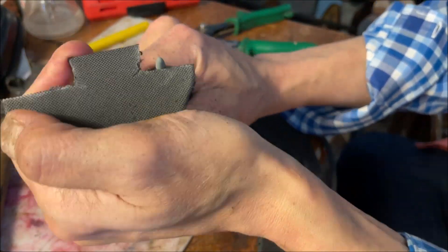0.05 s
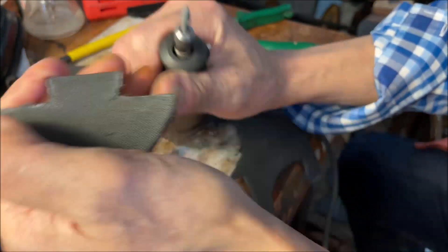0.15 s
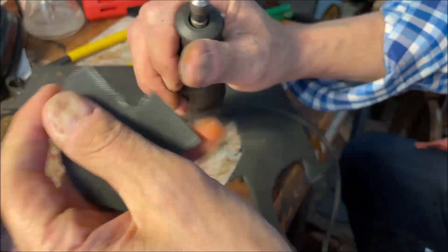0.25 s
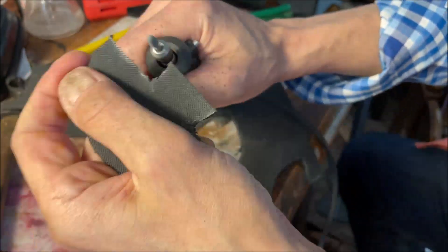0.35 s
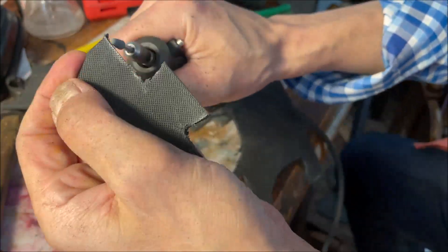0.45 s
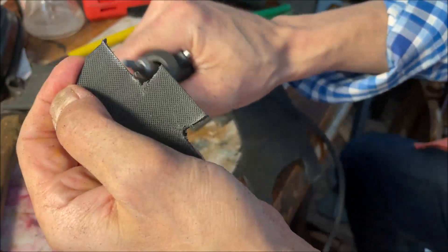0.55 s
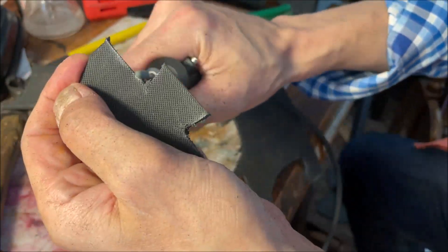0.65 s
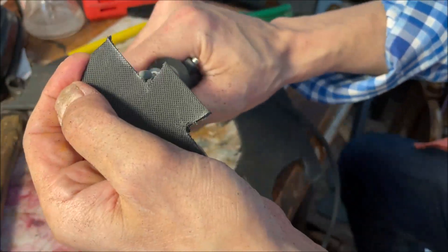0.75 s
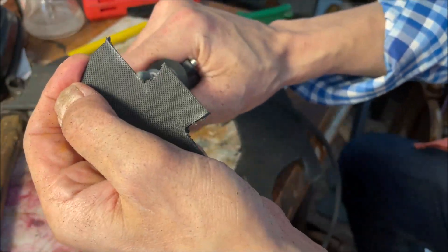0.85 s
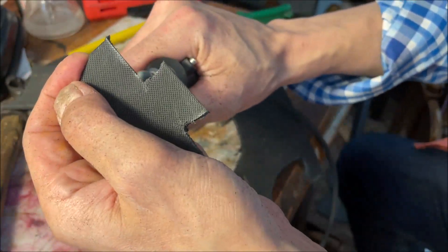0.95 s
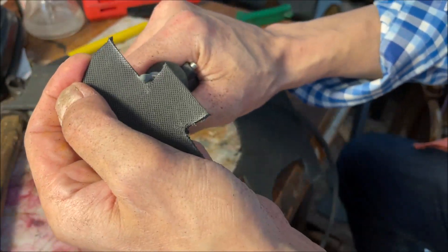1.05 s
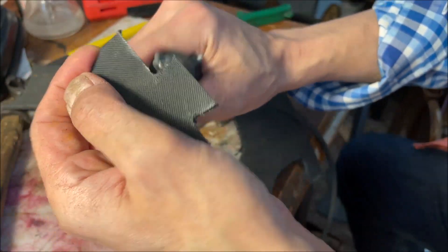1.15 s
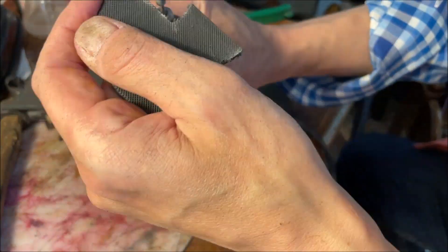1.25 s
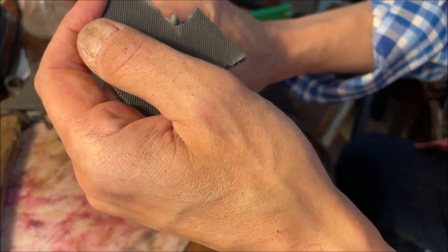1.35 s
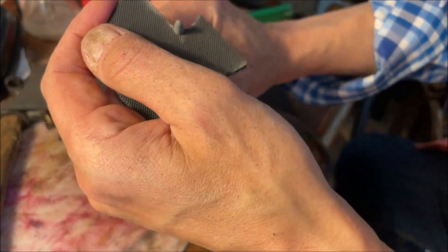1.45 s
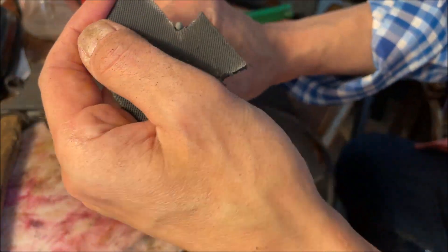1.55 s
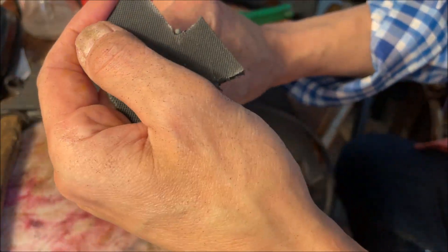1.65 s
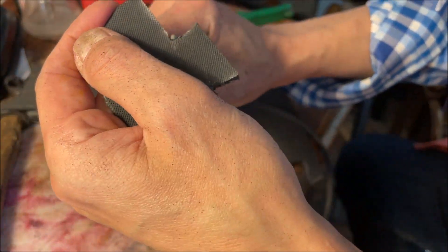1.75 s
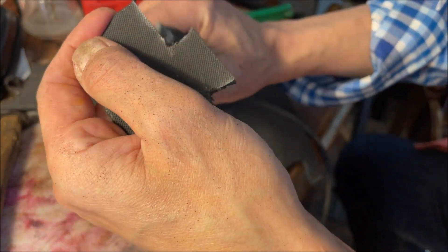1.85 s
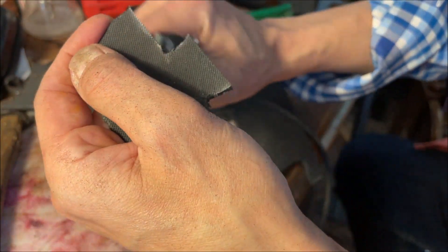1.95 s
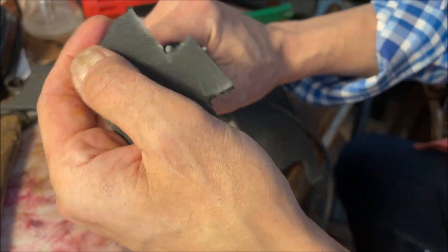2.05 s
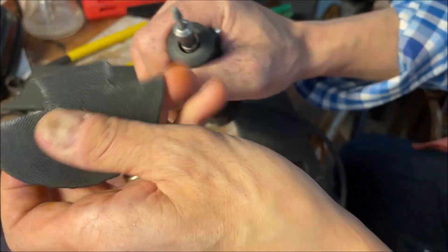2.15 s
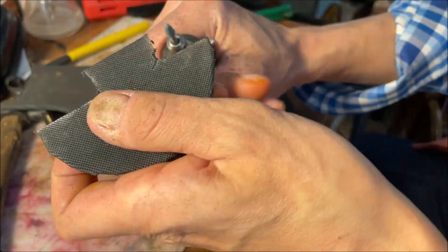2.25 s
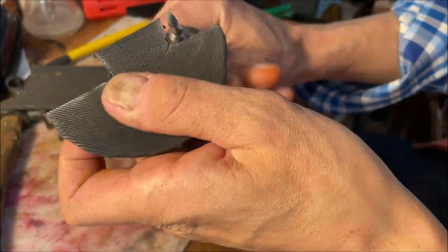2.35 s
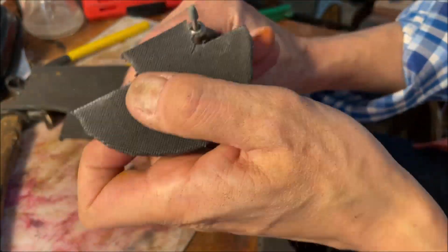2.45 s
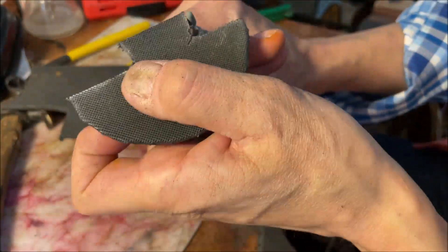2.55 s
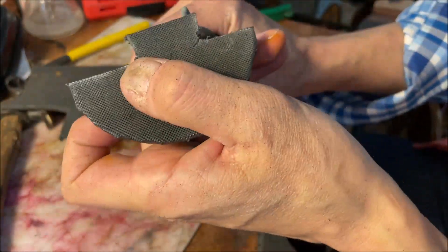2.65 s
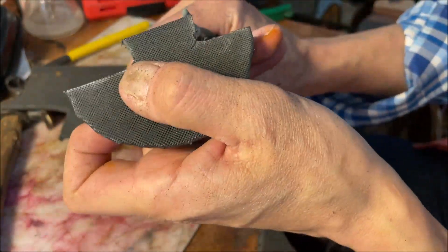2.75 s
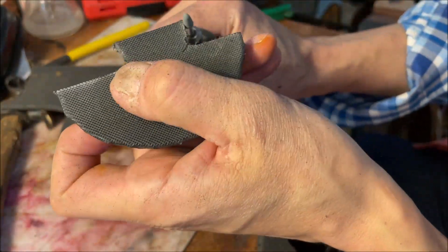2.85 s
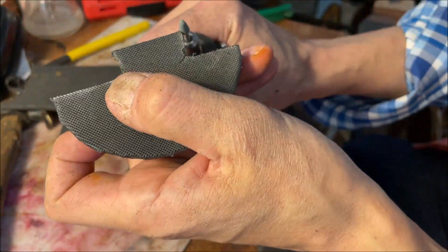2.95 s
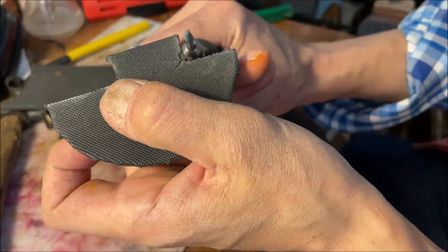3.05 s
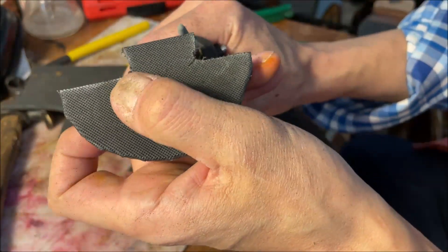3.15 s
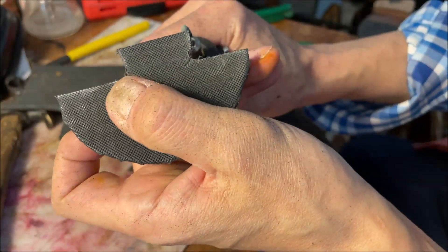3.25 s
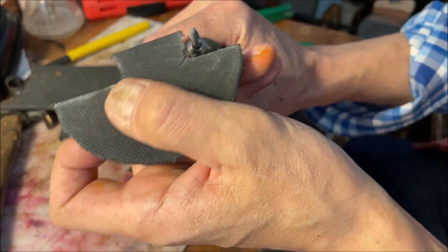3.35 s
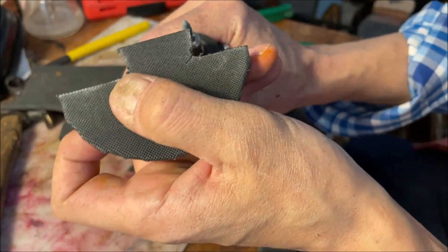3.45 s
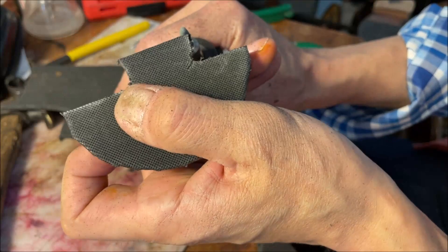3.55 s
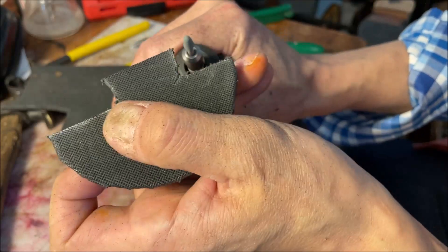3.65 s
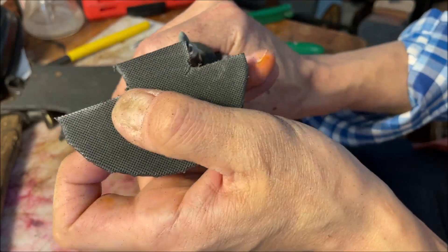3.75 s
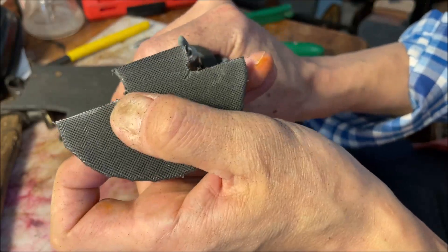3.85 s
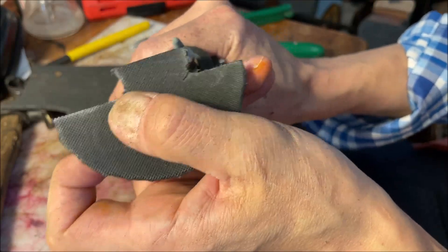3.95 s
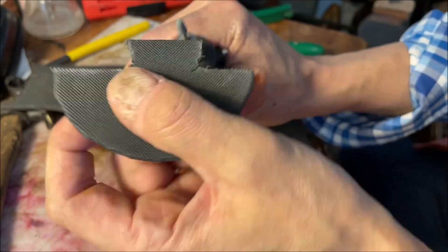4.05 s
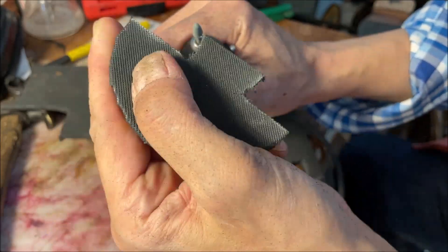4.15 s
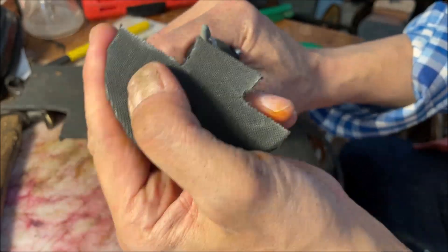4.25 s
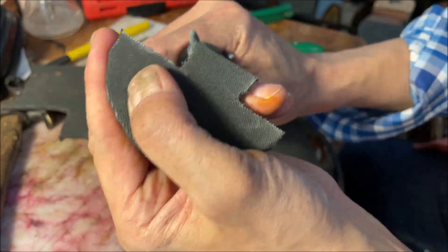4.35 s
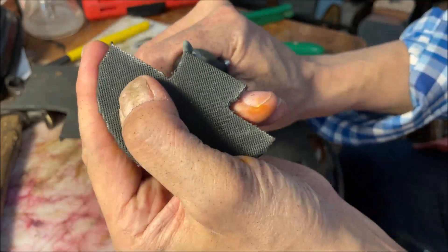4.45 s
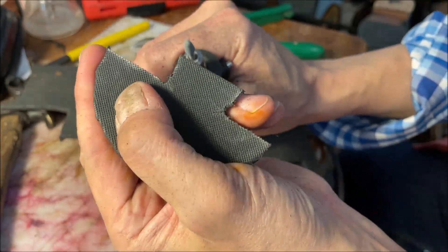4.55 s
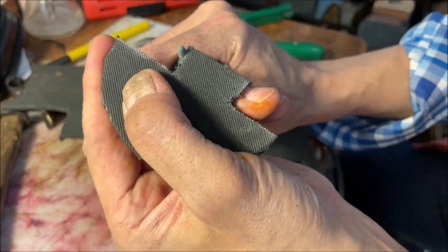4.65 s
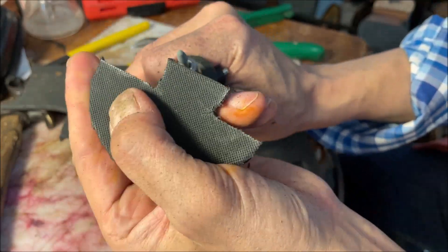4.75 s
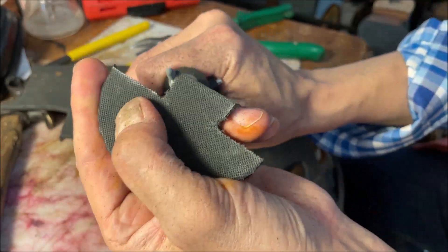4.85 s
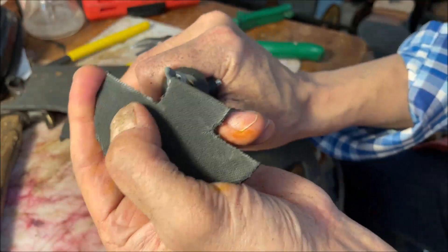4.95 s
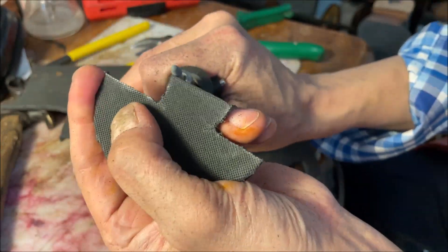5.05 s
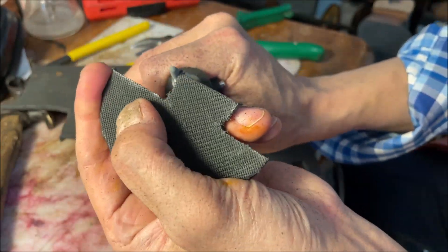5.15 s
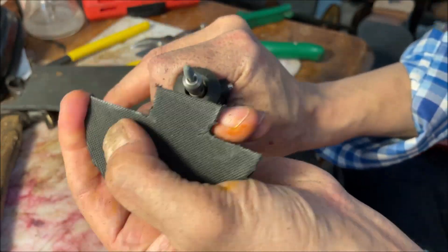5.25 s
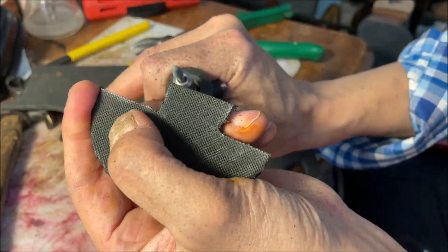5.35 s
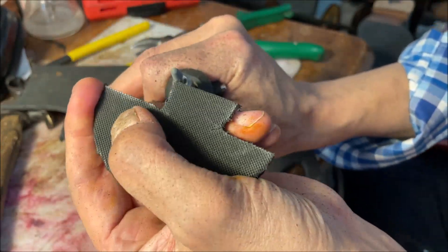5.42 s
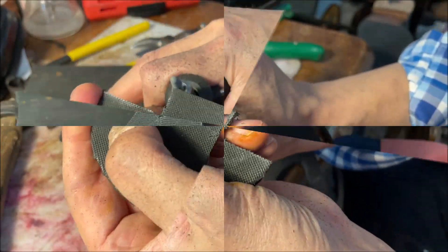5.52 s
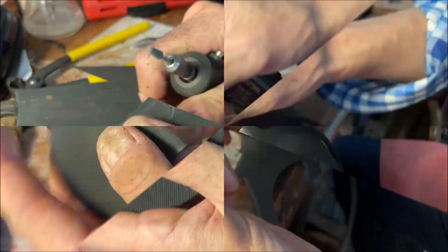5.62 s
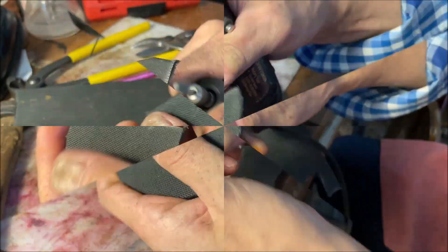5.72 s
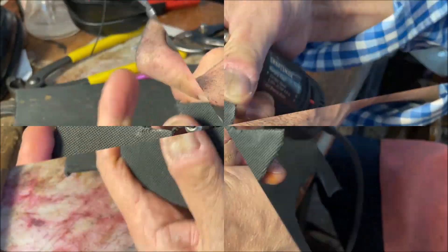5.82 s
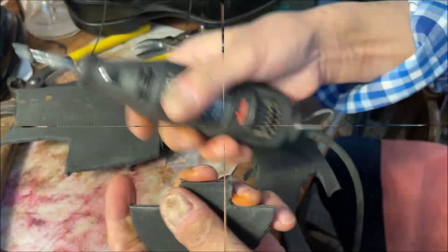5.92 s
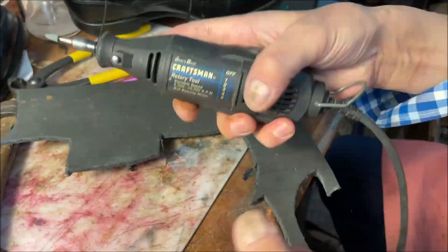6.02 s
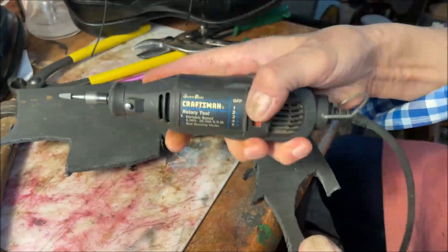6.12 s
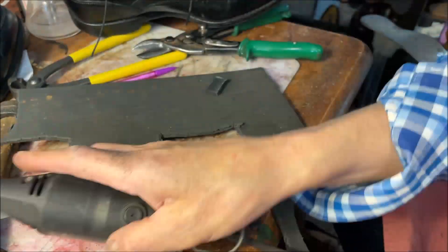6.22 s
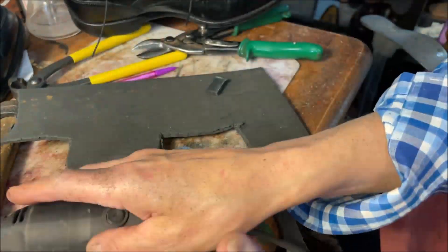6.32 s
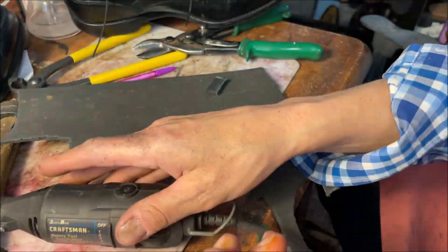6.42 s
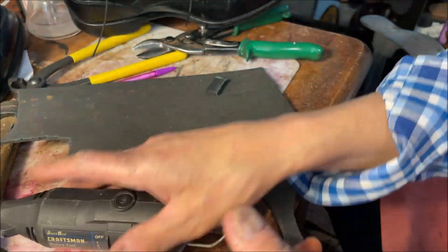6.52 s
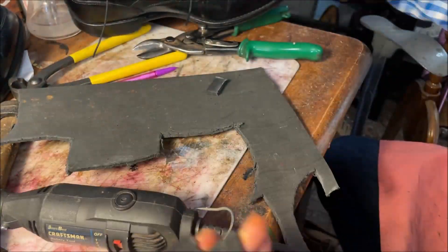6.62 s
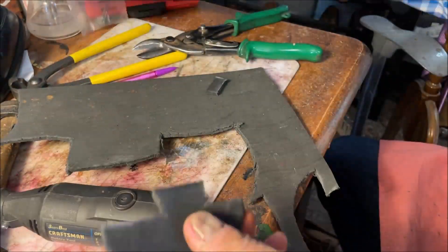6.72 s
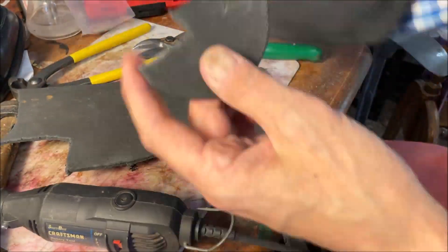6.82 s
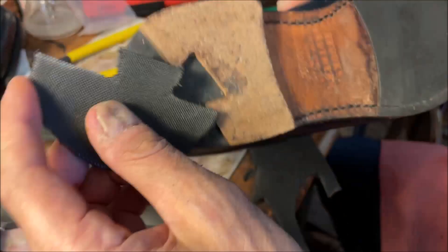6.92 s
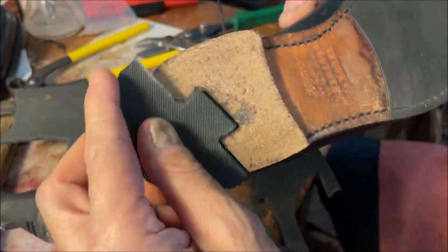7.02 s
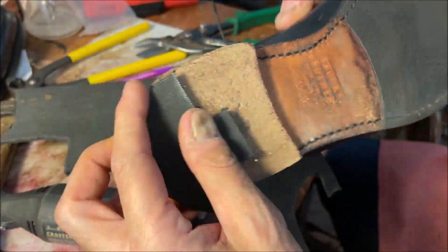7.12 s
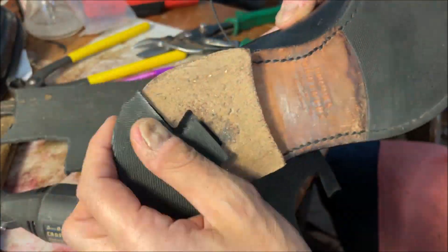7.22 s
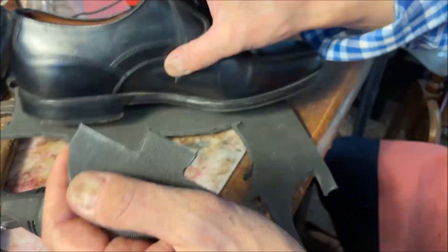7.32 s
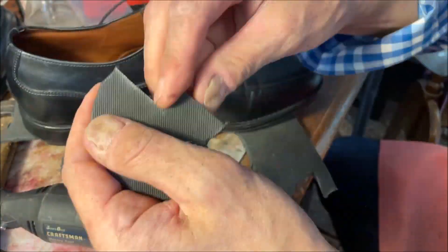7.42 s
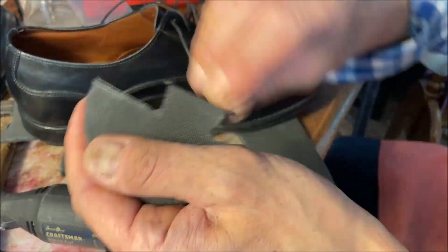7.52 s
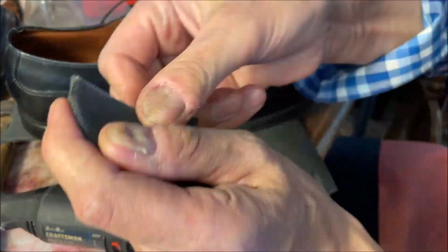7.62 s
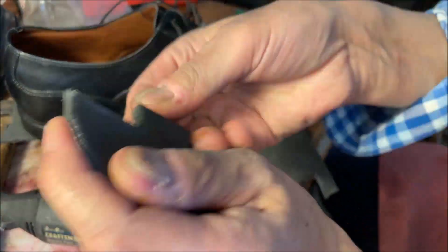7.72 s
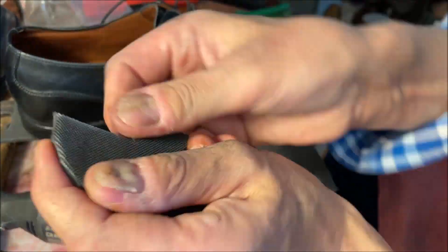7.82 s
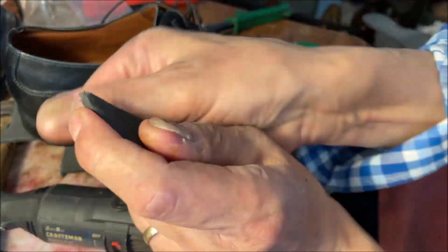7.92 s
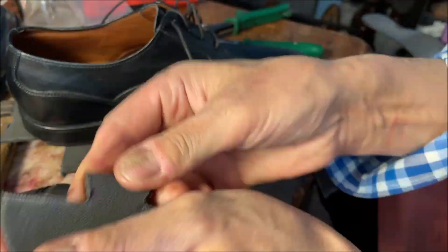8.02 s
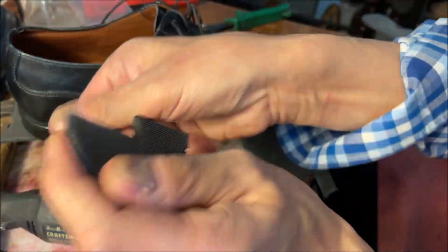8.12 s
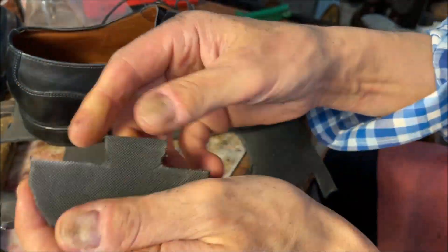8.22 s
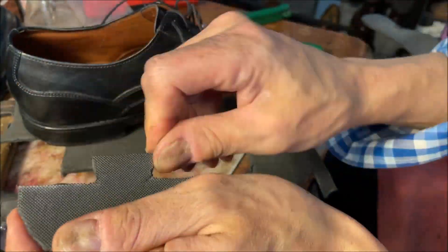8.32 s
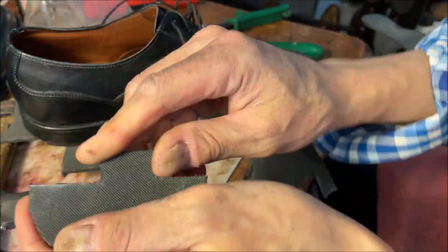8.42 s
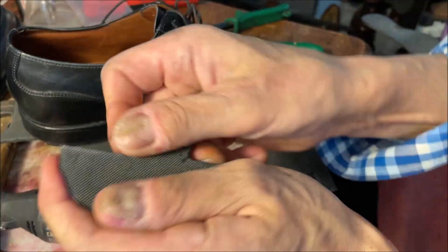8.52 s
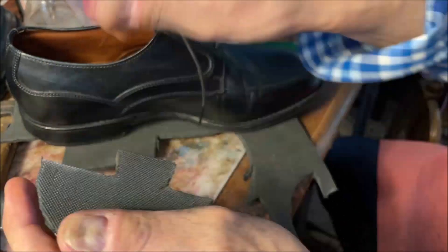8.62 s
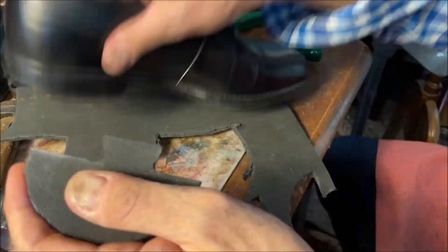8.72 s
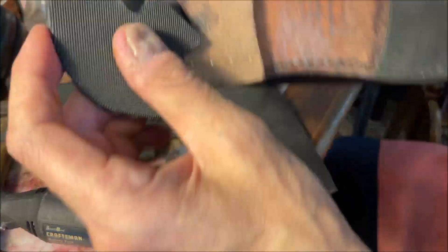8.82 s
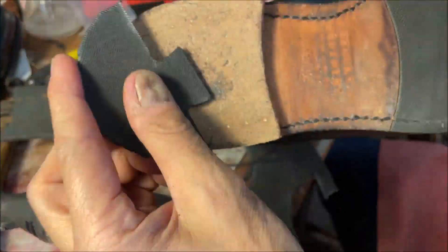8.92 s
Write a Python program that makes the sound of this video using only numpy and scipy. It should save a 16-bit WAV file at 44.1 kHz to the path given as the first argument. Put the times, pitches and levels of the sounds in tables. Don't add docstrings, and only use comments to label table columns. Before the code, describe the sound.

A steady low-mid hum and dull roar of a distant machine fill a small workshop, heard through a close, bright stereo microphone with little bass. From 0 to about 5.5 s a handheld rotary tool, slightly left, whines shrilly with a rough electrical buzz and strong hiss; every push into rubber drags the pitch down, then it recovers, with brief squeals, clustered near 1 s and from 4.3 to 5.3 s. At 5.5 s a faster whine overlaps, and the first ends abruptly at 6.0. Switched off near 6.2, it glides steeply downward. At 6.4 it knocks the bench and rattles metallically, slowing and fading by 6.8 with a few final clacks. Then, over the hum, fingers rub rubber; light ticks follow, a firmer click at 7.4, another around 8.15, and short faint squeaks, mostly 8.2 to the end at about 9 s.

```python
import sys
import numpy as np
from scipy import signal
from scipy.io import wavfile
from scipy.ndimage import uniform_filter1d

SR = 44100
rng = np.random.default_rng(int(sys.argv[2]) if len(sys.argv) > 2 else 0)


def persist_wave(psi):
    counts = np.round(np.clip(psi, -1, 1) * 32767).astype(np.int16)
    wavfile.write(sys.argv[1], SR, np.atleast_2d(counts).T)


def boost(x):
    u = np.asarray(x, float) / 20
    return 10 ** u


N = 396018
T = np.arange(N) / SR

# time_s, level_db
SHOP = [(0.0, -40), (5.5, -40), (5.58, -39.5), (6.03, -36), (6.04, -41), (6.45, -41), (7.0, -41.5),
        (7.6, -40.5), (8.98, -38.5)]
# frequency_hz, density_db (per Hz)
SHOP_COLOUR = [(24, -48), (80, -52), (140, -25), (200, -12), (300, -20.5), (430, -12), (600, -26.5),
               (950, -25), (1120, -29), (1700, -24), (1850, -37.5), (3600, -43.5), (6000, -63),
               (16000, -80)]
# frequency_hz, width_hz, level_db
SHOP_RINGS = [(858, 24, -51), (733, 60, -48)]
# frequency_hz, likeness (0 to 1)
SHOP_SAME = [(60, .6), (130, 1), (550, 0.91), (1000, 1), (1650, 0.3), (15000, 0.46)]
# frequency_hz, phase_rad
SHOP_LEAD = [(0, 6), (150, 0.25), (500, -0.13), (1000, -0.95), (22050, -19.2)]
SHOP_DB, HUM_DB, MAINS_HZ = -43, -36.5, 480.0
WHISTLE_HZ, WHISTLE_DB = 3450, -63.5

# start_s, length_s, level_db, centre_hz, width_hz
RUBS = [(3.915, 0.051, -32, 10400, 1500), (5.936, 0.066, -28, 5170, 1200), (6.777, 0.019, -45, 4000, 5000),
        (6.795, 0.041, -47, 7000, 9000), (7.043, 0.03, -58, 9500, 3000), (7.184, 0.02, -57, 13000, 3000),
        (6.321, 0.14, -38, 940, 400), (7.454, 0.021, -60, 7800, 6000), (7.947, 0.034, -48, 9300, 6000),
        (8.047, 0.026, -54, 8000, 6000), (8.109, 0.056, -52, 9000, 5000), (8.201, 0.07, -44, 3950, 4000),
        (8.215, 0.17, -61, 12500, 5000), (8.43, 0.12, -65, 11000, 6000), (8.597, 0.11, -55, 9000, 6000),
        (8.674, 0.18, -55.5, 10900, 7000)]
# start_s, length_s, start_hz, level_db, third_harmonic_db
SQUEAKS = [(6.852, 0.06, 2440, -50, -55), (7.134, 0.053, 3070, -53, -78), (7.138, .042, 7300, -66, -90),
           (8.24, 0.035, 2300, -47, -65), (8.291, 0.043, 2440, -35, -44), (8.43, 0.041, 2230, -50, -76),
           (8.43, 0.032, 8600, -55, -90), (8.481, 0.04, 2400, -53, -51), (8.619, 0.037, 2400, -49, -44.5),
           (8.699, 0.052, 2500, -53, -52), (8.772, 0.1, 3960, -45, -92), (8.795, 0.048, 3320, -52, -92),
           (8.913, 0.056, 3490, -49, -52), (8.914, 0.051, 7040, -39.5, -90)]
ARCH, ARCH_S, SECOND_DB = 0.17, 0.088, -22

# start_s, peak_db, bench_thud_db, ring_hz, left_right_db
KNOCKS = [(6.3685, -40, -35, 3000, 1), (6.3793, -20, -35, 4370, 7), (6.381, -19, -8.5, 3000, 6),
          (6.445, -27, -22, 9000, 10), (6.4496, -26, -26, 9000, 4), (6.7515, -40, -50, 9000, 5),
          (6.7644, -31, -40, 3730, 15), (6.773, -26, -35, 4200, 5), (6.7802, -22, -39, 4370, 4),
          (6.791, -29, -33, 2980, -2), (6.8147, -16.5, -57, 6300, 5.5), (6.834, -56, -31, 4020, 2)]
# start_s, peak_db, bench_thud_db, ring_hz, left_right_db
TICKS = [(6.929, -44.5, -40, 4500, 13), (6.975, -48, -43, 3840, 17), (7.109, -35, -33, 2300, 6),
         (7.186, -43, -50, 2000, 2), (7.1996, -29.5, -61, 2760, 6), (7.397, -33, -43, 5000, 4),
         (7.401, -22.5, -14.5, 3020, 5), (7.4085, -29, -22, 7350, 4), (7.43, -54, -55, 5500, 4),
         (7.458, -35, -31, 7610, -0.5), (7.4674, -41, -45, 7050, 7), (7.7244, -55, -54, 4030, 2),
         (7.777, -49, -40, 4340, 8), (7.918, -58, -60, 9000, 2), (7.998, -48, -50, 4000, 3),
         (8.088, -47, -55, 5000, 2), (7.9645, -40, -41, 10500, 1.0), (8.0587, -47, -37, 13300, 2),
         (8.132, -46, -37, 8930, 0), (8.1556, -27.5, -26, 10200, 6), (8.19, -45, -48, 4310, 0.0),
         (8.587, -41, -40, 3840, 11), (8.646, -36, -46, 7310, 15), (8.657, -38, -38, 8240, 3),
         (8.6994, -38, -43, 3700, -0.5), (8.903, -43, -37, 7060, 13)]
# frequency_hz, width_hz, level_db
THUD = [(870, 200, 0), (420, 200, 1), (1300, 500, -9)]
THUD_S = .00015

# time_s, shaking_db, bench_weight_db
CHATTER = [(6.4445, -28, -25), (6.462, -19.5, -34.5), (6.512, -29, -36), (6.535, -24, -34),
           (6.55, -31, -35), (6.585, -25, -31.5), (6.63, -29, -39.5), (6.645, -40, -39), (6.7, -33, -34.5),
           (6.733, -47, -28), (6.76, -66, -38)]
# frequency_hz, width_hz, level_db
HANGER = [(13320, 240, 12), (13700, 460, -26.5), (14000, 700, -3.5), (15000, 950, -19), (9000, 770, -32)]
# frequency_hz, width_hz, level_db
WIRE = [(13700, 1300, 0), (9000, 820, -6)]
# frequency_hz, width_hz, level_db
BENCH = [(915, 130, 18.5), (1250, 300, -27), (524, 190, 11.5)]
# frequency_hz, width_hz, level_db
HOUSING = [(2200, 800, 10), (3700, 1000, 11), (6000, 3000, -12)]
# start_s, peak_db
JOLTS = [(6.4438, -9), (6.4492, -9), (6.46, -13), (6.4664, -14), (6.4765, -12), (6.4871, -20),
         (6.5009, -16), (6.5314, -13), (6.5345, -15), (6.5513, -18), (6.561, -16), (6.5746, -17),
         (6.583, -17), (6.5874, -11), (6.5964, -15), (6.6012, -10), (6.611, -14), (6.6234, -13),
         (6.6275, -14), (6.6444, -22), (6.6622, -21), (6.6655, -22), (6.6751, -20), (6.6842, -25),
         (6.6951, -22), (6.7006, -22), (6.7106, -28), (6.7144, -22), (6.7232, -23), (6.7279, -22),
         (6.7336, -22), (6.7407, -27), (6.7507, -25)]
JOLT_S, JOLT_RISE_S = .0005, .0003
CHATTER_END_S, HOUSING_DB, HOUSING_RISE_S = 6.799, -14, 0.033

# time_s, level_db
AIR = [(0.0, -43), (0.45, -45.5), (0.57, -42.5), (1.2, -45.5), (1.8, -43.5), (2.13, -42), (2.2, -43.5),
       (3.6, -46), (4.3, -43), (5.497, -44.5), (5.564, -38.5), (5.927, -40), (5.965, -38), (6.327, -43.5),
       (6.42, -48), (6.455, -47.5), (6.73, -53.5), (6.8, -73)]
# frequency_hz, density_db (per Hz)
HISS_COLOUR = [(590, -15.5), (1000, -25.5), (1140, -26), (1490, -8), (2040, -8.5), (2660, -4.5),
               (2950, -8.5), (3250, -1), (3560, 2), (4440, -1.5), (8050, -1.5), (9150, 0.5), (9820, -2),
               (11200, -1.5), (15100, -8.5), (16200, -22)]
# frequency_hz, likeness (0 to 1)
HISS_SAME = [(60, 1), (240, 0.52), (950, 0.96), (3770, 0.31), (15000, 0.73)]
# frequency_hz, phase_rad
HISS_LEAD = [(0, 4.6), (1550, -1.4), (2580, 1.5), (5170, 2), (5680, 0.4), (8960, 3.5), (9560, 1.77),
             (16500, 0.35)]
# frequency_hz, left_right_db
HISS_PAN = [(60, 13), (180, 38), (550, -29.5), (1650, 4.5), (4970, 5.5), (15000, 4.5)]
HISS_PER_GRIP = 0.21

# start_s, length_s, final_drag_hz (turns per s)
CUTS = [(-.47, .538, 137), (.001, .168, 210), (.536, .699, 192), (.921, .263, 107), (1.08, .026, 262),
        (1.091, .055, 64), (1.157, .068, 153), (1.388, .146, 117), (1.4, .092, 124), (1.535, .599, 109),
        (1.569, .247, 151), (1.979, .611, 28), (2.115, .027, 118), (2.29, .18, 10), (2.622, .229, 222),
        (2.858, .27, 109), (2.899, .054, 39), (3.162, .234, 219), (3.36, .088, 22), (3.456, .208, 370),
        (3.547, .085, 22), (3.773, .199, 122), (3.897, .239, 75), (4.137, .202, 29), (4.255, .055, 75),
        (4.364, .07, 139), (4.458, .15, 157), (4.638, .149, 190), (4.692, .028, 99), (4.784, .192, 62),
        (4.874, .071, 96), (4.998, .095, 223), (5.122, .196, 300), (5.153, .03, 74), (5.457, .121, 27)]
# start_s, length_s, level_db
BITES = [(0, 0.089, -41), (0.513, 0.42, -38.5), (0.874, 0.37, -33.5), (1.373, 0.21, -42.5),
         (1.56, 0.28, -44.5), (1.842, 0.3, -36.5), (2.62, 0.24, -42.5), (2.914, 0.26, -42),
         (3.176, 0.19, -41), (3.436, 0.2, -45.5), (3.993, 0.11, -45), (4.478, 0.11, -41),
         (4.57, 0.045, -42), (4.673, .1, -42), (4.99, 0.08, -44), (5.15, 0.14, -51)]
# centre_s, spread_s, level_db
SQUEALS = [(.02, 0.024, -40), (.15, 0.014, -33.5), (.55, 0.021, -47), (.97, 0.071, -37),
           (1.08, 0.0088, -32.5), (1.18, 0.023, -31.5), (1.8, 0.023, -42), (2.03, 0.049, -40),
           (2.8, 0.02, -37), (3.6, 0.015, -41), (3.76, 0.055, -55), (4.07, 0.033, -58), (4.305, 0.011, -38),
           (4.43, 0.0071, -35), (4.6, 0.0057, -32.5), (4.755, 0.017, -32.5), (4.935, .012, -31.5),
           (5.07, 0.016, -35), (5.18, 0.02, -33.5), (5.225, 0.016, -37), (5.29, 0.029, -45)]
# time_s, whine_db, shaft_db
FACING = [(0.0, -27.5, -60), (0.3, -29, -58), (0.5, -31, -55), (1.05, -33, -54), (1.3, -28.5, -58),
          (2.1, -31, -60), (2.2, -32, -58), (2.4, -28, -56), (3.15, -31, -58), (3.45, -30, -60),
          (3.7, -29, -60), (4.1, -30, -58), (4.3, -28, -55), (4.95, -30.5, -58), (5.3, -30.5, -60),
          (5.65, -29.5, -60), (5.75, -29, -50), (6.03, -28, -44)]
FREE_HZ, INERTIA_S, STEP_S = 1384, .169, .002
FIRST_TOUCH = .142
CURRENT_DB, CURRENT_KNEE_HZ = 6.5, 121
IDLE_THIRD_DB, IDLE_CUTTER_DB, THIRD_PER_GRIP_DB, GRIP_EDGE_S = -47, -47, -31, .03

# time_s, shaft_hz (turns per s)
COAST = [
    (5.5, 1612),
    (5.8, 1664),
    (6.03, 1706),
    (6.12, 1718),
    (6.187, 1712),
    (6.3, 1345),
    (6.4, 1015),
    (6.6, 430),
    (6.77, 60),
]
# time_s, whine_db, third_order_db, shaft_db
COAST_DB = [
    (5.5, -59, -63, -64),
    (5.58, -38, -44, -46),
    (5.8, -33, -40, -53),
    (5.96, -32, -35.5, -51),
    (6.18, -35, -43, -62),
    (6.23, -29, -40, -58),
    (6.27, -34, -38, -47),
    (6.36, -40, -43, -50),
    (6.44, -56, -53, -59),
    (6.7, -90, -76, -74),
]
# mains_multiple, level_db
SIDE_LINES = [(-4, -10.5), (-3, -6), (-2, -4.5), (-1, -2), (0, 1), (1, -2.5), (2, -8.5), (3, -11), (4, -22)]
# frequency_hz, gain_db
CASING = [(8000, -12.5), (8700, 1.5), (9400, 2), (10300, 0), (10900, 1.5), (11600, -3.5), (12100, -2),
          (13500, 2)]
# order, level_db, left_lead_rad
CUTTER = [(1, -11, .2), (2, 1.5, 1.1), (4, -9, -.6), (5, -1.5, .4), (6, -5, 1.2), (7, 0, 1.3), (9, -2, .6),
          (10, -6, .5), (11, -6, .5)]
BARS = 8
FOURTH_DB, RASP, SKIRT = -11, .3, .17


def evened(x):
    return x / np.sqrt(np.mean(x ** 2) + 1e-20)


def read(points, hz):
    f, value = np.transpose(points)
    return np.interp(np.log(hz + 1), np.log(f + 1), value)


def curves(rows, t):
    s, *columns = np.transpose(rows)
    return [np.interp(t, s, c) for c in columns]


def add(mix, s, sound):
    part = mix[:, round(s * SR):][:, :sound.shape[1]]
    part += sound[:, :part.shape[1]]


def pan(db):
    return boost(np.array([[db / 2], [-db / 2]]))


def drift(rate_hz, count, t=T):
    knots = rng.standard_normal((count, 1500))
    return [np.interp(t * np.clip(rate_hz, 1, 160), np.arange(1500), k) for k in knots]


def ring(x, modes):
    out = 0
    for hz, width, db in modes:
        r = np.exp(-np.pi * width / SR)
        pole = r * np.exp(2j * np.pi * hz / SR)
        out = out + 2 * boost(db) * signal.lfilter([1 - r], [1, -pole], x).real
    return out


def noise(colour_db, same, lead, patchy_db, null_db):
    frames = N // 128 + 5
    hz = np.fft.rfftfreq(512, 1 / SR)[:, None]
    a, b, c, d, patches, slots = rng.standard_normal((frames, 257, 6)).T
    patches = evened(uniform_filter1d(uniform_filter1d(patches, 8, 0), 16, 1))
    slots = evened(uniform_filter1d(uniform_filter1d(slots, 3, 0), 24, 1))
    nulls = null_db * np.clip(slots - .8, 0, 1) / (1 + (hz / 3600) ** 3)
    like = np.clip(read(same, hz), 0, 1)
    left = a + 1j * b
    right = like * left * np.exp(-1j * read(lead, hz)) + np.sqrt(1 - like ** 2) * (c + 1j * d)
    level_db = colour_db(hz, np.arange(frames) * 128 / SR) + patchy_db * patches - nulls
    z = np.array([left, right]) * boost(level_db)
    return signal.istft(z, nperseg=512, noverlap=384)[1][:, :N]


def shop():
    level_db, = curves(SHOP, T)
    roar = evened(noise(lambda hz, t: read(SHOP_COLOUR, hz), SHOP_SAME, SHOP_LEAD, patchy_db=1.5, null_db=0.4))
    shared, *own = rng.standard_normal((3, N))
    draught = shared + 0.33 * np.array(own)
    ducts = sum(boost(db) * evened(ring(draught, [(hz, width, 0)])) for hz, width, db in SHOP_RINGS)
    hum = np.sin(2 * np.pi * MAINS_HZ * T + np.array([[0], [.35]])) * pan(-1.1)
    hum = boost(HUM_DB + 2.0 + 0.45 * drift(4.8, count=1)[0]) * hum
    whistle = np.sin(2 * np.pi * WHISTLE_HZ * T + np.array([[0], [.8]]))
    whistle = boost(WHISTLE_DB + 2.3 * drift(12, count=1)[0]) * whistle
    return boost(level_db + 40.5) * (boost(SHOP_DB) * roar + ducts + hum + whistle)


def handling():
    out = np.zeros((2, N))
    for (s, length, db, hz, width), grit in zip(RUBS, rng.standard_normal((len(RUBS), 2, 12000))):
        band = [(hz, width, 0)]
        rub = ring(ring(grit + 0.16 * grit[0], band), band)[:, :int(length * SR)]
        add(out, s, boost(db) * evened(rub) * np.hanning(rub.shape[1]))
    for (s, length, hz, db, third_db), grit in zip(SQUEAKS, rng.standard_normal((len(SQUEAKS), 2, 6000))):
        u = np.linspace(0, 1, int(length * SR))
        arch_hz = hz * ARCH * (length / ARCH_S) ** 4
        wobble, flutter = evened(uniform_filter1d(grit, 120))[:, :len(u)]
        pitch_hz = (hz + arch_hz * np.sin(np.pi * u)) * (1 + .014 * wobble)
        slip = 2 * np.pi * np.cumsum(pitch_hz) / SR
        harmonics_db = (db, db + SECOND_DB, third_db)
        tone = sum(boost(part - 7.5) * np.sin((k + 1) * slip) for k, part in enumerate(harmonics_db))
        add(out, s, pan(1) * tone * boost(4.4 * flutter) * signal.windows.tukey(len(u), .5))
    return out


def ticks():
    out, t = np.zeros((2, N)), np.arange(1500) / SR
    hits = KNOCKS + TICKS
    cracks = rng.standard_normal((len(hits), 1500)) * np.exp(-t / 0.0029) * np.minimum(t / 0.0013, 1)
    push = (1 - t / THUD_S) * np.exp(-t / THUD_S)
    for (s, peak_db, thud_db, ring_hz, side_db), crack in zip(hits, cracks):
        bright = ring(crack, [(ring_hz, 2500, 0), (2300, 1500, -4)])
        bright = ring(bright, [(ring_hz, 5000, 0), (3000, 4000, -2)])
        thud = ring(push + .12 * crack, THUD)
        hit = boost(peak_db) * bright / abs(bright).max() + boost(thud_db) * thud / abs(thud).max()
        add(out, s - .0005, pan(side_db) * hit)
    return out


def chatter():
    start_s = CHATTER[0][0]
    on = (T > start_s) & (T < CHATTER_END_S)
    hanger_db, bench_db = curves(CHATTER, T)
    housing_db = hanger_db + 4.5 + HOUSING_DB - 12 * np.clip(1 - (T - start_s) / HOUSING_RISE_S, 0, 1)
    turns = np.cumsum(curves(COAST, T)[0]) / SR
    luck, size, grit = rng.random(N), rng.exponential(1, N), rng.standard_normal(N)
    taps = np.diff(np.floor(turns), prepend=0) * boost(4.6 * np.minimum(size, 2))
    taps = taps / taps[on].std() + .8 * grit
    scrape = taps + 1.2 * rng.standard_normal((2, N))
    loose = (luck < 2500 / SR) * boost(4.5 * np.minimum(size, 3)) * np.sign(grit)
    parts = [(ring(loose, WIRE), HANGER, hanger_db, 7),
             (taps, BENCH, bench_db, 1.5),
             (scrape, HOUSING, housing_db, 4)]
    out = 0
    for drive, modes, db, side_db in parts:
        rung = ring(drive, modes)
        strength = np.sqrt(abs(uniform_filter1d(rung ** 2, size=900)) + 1e-9)
        out = out + pan(side_db) * on * boost(db) * rung / strength
    t = np.arange(900) / SR
    scuffs = rng.standard_normal((len(JOLTS), 900)) * np.exp(-t / JOLT_S) * np.minimum(t / JOLT_RISE_S, 1)
    for (s, db), clank in zip(JOLTS, ring(ring(scuffs, WIRE), HANGER)):
        add(out, s - .0003, pan(6) * boost(db + 1) * clank / abs(clank).max())
    return out


def cutting():
    t = np.arange(-.5, 7, STEP_S)
    drag, squeal, grip = 0, boost(IDLE_THIRD_DB), boost(IDLE_CUTTER_DB)
    for s, length, push in CUTS:
        u = (t - s) / length
        touching = np.clip((t - s) / .01 + .5, 0, 1) * np.clip((s + length - t) / .01 + .5, 0, 1)
        drag = drag + push * touching * (FIRST_TOUCH + (1 - FIRST_TOUCH) * u)
    for s, length, grip_db in BITES:
        grip = grip + boost(grip_db) * np.clip(np.minimum(t - s, s + length - t) / GRIP_EDGE_S, 0, 1)
    for s, spread, db in SQUEALS:
        squeal = squeal + boost(db) * np.exp(-.5 * ((t - s) / spread) ** 2)
    keep = np.exp(-STEP_S / INERTIA_S)
    sag = signal.lfilter([1 - keep], [1, -keep], drag)
    facing_db, shaft_db = curves(FACING, t)
    whine_db = facing_db + CURRENT_DB * np.tanh(sag / CURRENT_KNEE_HZ)
    third_db = 20 * np.log10(squeal + boost(THIRD_PER_GRIP_DB) * grip)
    return np.transpose([t, FREE_HZ - sag, whine_db, third_db, 20 * np.log10(grip), shaft_db])


def hiss():
    def colour_db(hz, t):
        grip_db = curves(cutting(), t)[3] - IDLE_CUTTER_DB
        level_db = curves(AIR, t)[0] + HISS_PER_GRIP * grip_db
        bright_db = 0.1 * np.clip(level_db + 62, -6, 6) * np.log2(hz / 6500 + 0.12)
        return read(HISS_COLOUR, hz) - read(HISS_COLOUR, 5900) + level_db + bright_db
    air = noise(colour_db, HISS_SAME, HISS_LEAD, patchy_db=1.62, null_db=24)
    left, right = air * np.clip((6.86 - T) / 0.018, 0, 1)
    hz = np.linspace(0, SR / 2, 65)
    side = signal.firwin2(129, hz, boost(-read(HISS_PAN, hz)), fs=SR)
    return boost(-8.5) * np.array([left, signal.oaconvolve(right, side, "same")])


def rotor(t, speed, whine_db, third_db, cutter_db, shaft_db, powered):
    turn = 2 * np.pi * np.cumsum(speed + 1.37 * drift(50, count=1, t=t)[0]) / SR
    chop = 0
    for (k, db), wander, flicker in zip(SIDE_LINES, drift(3.906, count=9, t=t), drift(45, count=9, t=t)):
        line_db = db + 1.7 * wander + 2.2 * flicker + read(CASING, abs(BARS * speed + k * MAINS_HZ))
        pulse = np.exp(1j * k * (2 * np.pi * MAINS_HZ * t - 0.053 * k))
        chop = chop + boost(line_db) * pulse * (powered if k else 1)
    whine = boost(whine_db - 5.0) * chop * np.exp(1j * BARS * turn)
    beat, slip = drift(70, count=2, t=t)
    grain = evened(uniform_filter1d(rng.standard_normal(len(t)), size=90))
    whine = whine * (1 + 1j * SKIRT * grain)
    orders = np.exp(3j * turn) + boost(FOURTH_DB - 3 * beat) * np.exp(4j * turn)
    third = boost(third_db + 1.5 + 1.8 * beat) * (1 + RASP * grain) * orders * np.exp(.3j * slip)
    third = third + boost(shaft_db + 3.5 * slip) * np.exp(1j * turn)
    left = whine + third
    right = boost(-7.5) * whine * np.exp(-.9j) + boost(-8) * third
    flickers = zip(*(drift(rate, count=9, t=t) for rate in (7, 60, 90)))
    for (order, db, lead), (patch, beat, slip) in zip(CUTTER, flickers):
        flicker = boost(1.5 * patch + 3.2 * beat - .5) * np.exp(.5j * slip)
        line = boost(cutter_db + db - 10.5) * flicker * np.exp(1j * round(order) * turn)
        left = left + line
        right = right + boost(1.5) * line * np.exp(-1j * lead)
    return np.array([left.real, right.real])


def tool():
    out = np.zeros((2, N))
    t1, t2 = T[T < 6.036], T[(T >= 5.45) & (T < 6.8)]
    add(out, 0, rotor(t1, *curves(cutting(), t1), 1) * np.clip((6.036 - t1) / .004, 0, 1))
    speed, = curves(COAST, t2)
    whine_db, third_db, shaft_db = curves(COAST_DB, t2)
    powered = .6 * np.clip((6.18 - t2) / .02, 0, 1)
    add(out, t2[0], rotor(t2, speed, whine_db, third_db, third_db + 1.5, shaft_db, powered))
    return out


def walls(x):
    t = np.arange(6000) / SR
    sparse = (rng.random((2, 6000)) < .1) * (t > .001)
    taps = rng.standard_normal((2, 6000)) * sparse * boost(-60 * t / 0.12)
    return signal.oaconvolve(x.mean(0)[None], taps / np.linalg.norm(taps[0]), axes=1)[:, :N]


def scene():
    rattle, motor, knocks = chatter() + handling(), tool(), ticks()
    room = walls(boost(-13) * motor + boost(-7) * rattle + boost(-12.0) * knocks)
    return motor + rattle + knocks + room + hiss() + shop()


def gate(x):
    hz, _, z = signal.stft(x, SR, nperseg=1024, noverlap=768)
    power = (abs(z) ** 2).mean(0) + 1e-14
    near = uniform_filter1d(uniform_filter1d(power, size=4, axis=0), size=7, axis=1)
    wide = uniform_filter1d(uniform_filter1d(power, size=24, axis=0), size=7, axis=1)
    sunk = np.clip(10 * np.log10(abs(wide / near)) - 5, 0, 2) * (hz > 1000)[:, None]
    return signal.istft(z * boost(-6 * sunk), SR, nperseg=1024, noverlap=768)[1][:, :N]


def top_cut(x):
    return signal.sosfilt(signal.butter(12, 16970, fs=SR, output="sos"), x)


def record(dry):
    low_cut = signal.butter(N=14, Wn=137, btype="high", fs=SR, output="sos")
    lean = signal.sosfilt(low_cut, dry) + boost(-21) * dry
    edge = signal.firwin(255, 16050, window=("kaiser", 8), fs=SR)
    mix = signal.oaconvolve(gate(lean), edge[None], "same")
    return top_cut(mix)


dry = scene()
out = record(dry)
persist_wave(out)
```